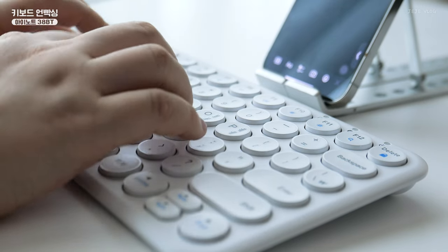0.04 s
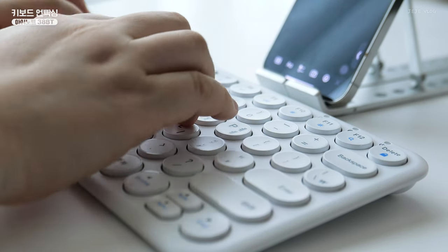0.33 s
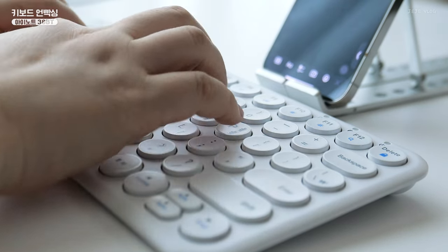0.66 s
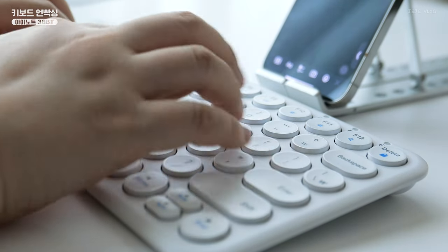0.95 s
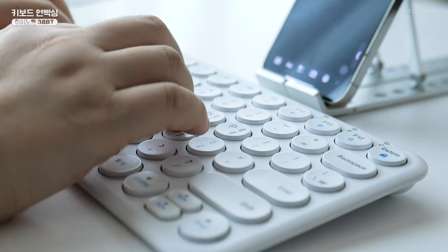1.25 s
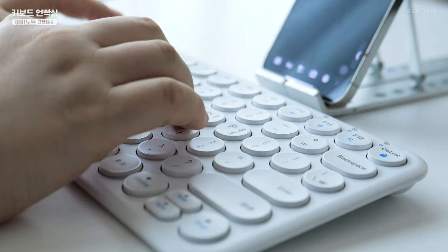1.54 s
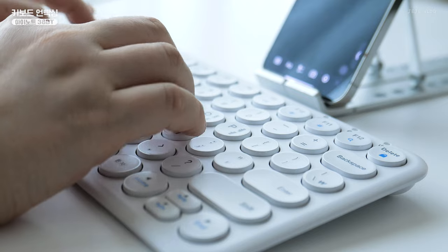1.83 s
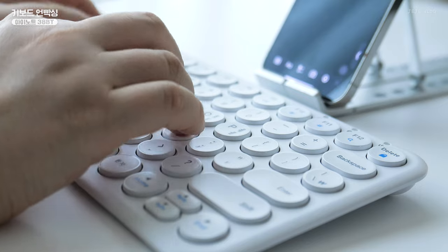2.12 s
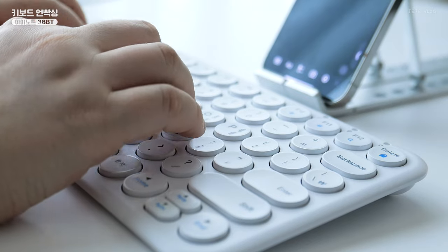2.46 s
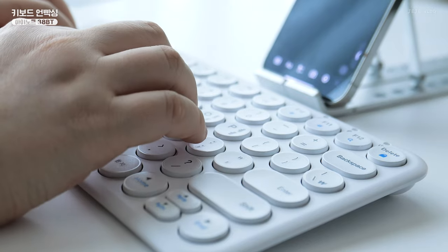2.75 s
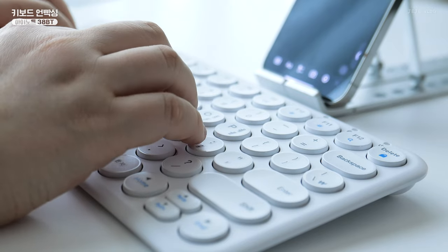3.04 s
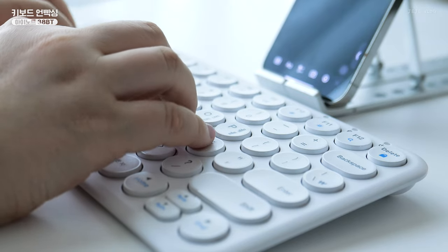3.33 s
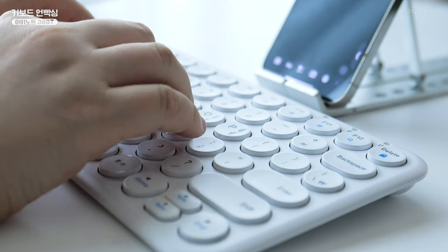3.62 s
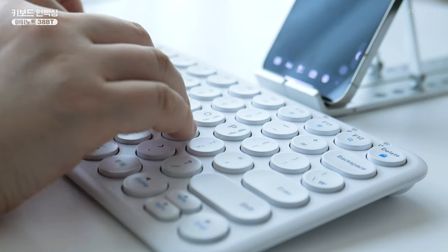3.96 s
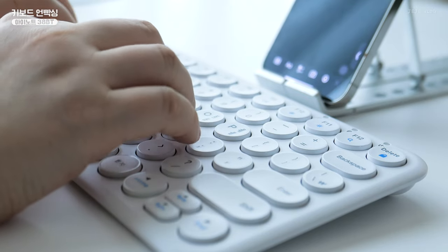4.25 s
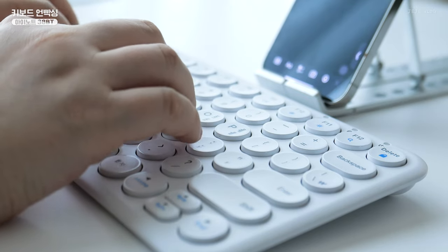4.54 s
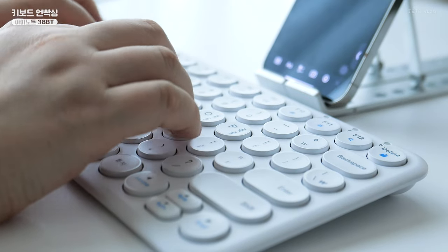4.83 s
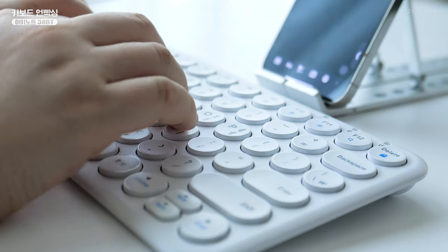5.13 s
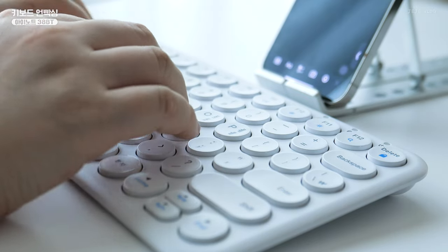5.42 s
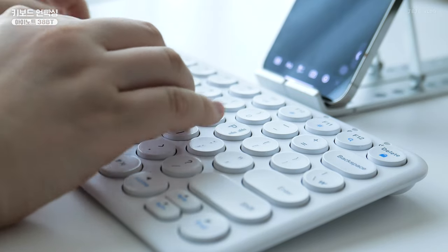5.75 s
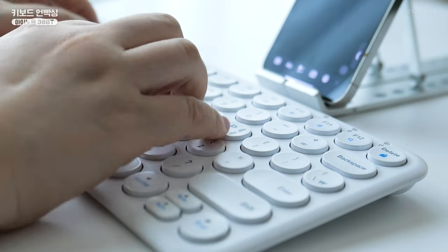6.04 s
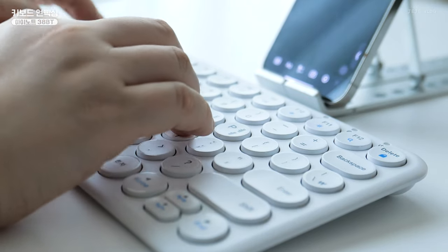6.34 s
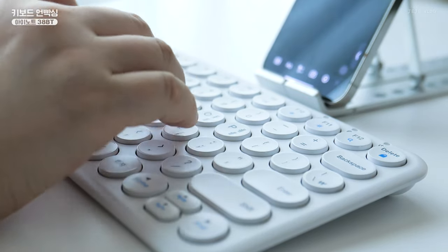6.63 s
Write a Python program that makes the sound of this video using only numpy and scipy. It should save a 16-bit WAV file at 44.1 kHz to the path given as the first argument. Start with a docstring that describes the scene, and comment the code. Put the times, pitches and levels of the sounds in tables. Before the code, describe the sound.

Quiet, uneven typing on a small plastic keyboard, with light taps, a few sharper clicks and a brief lull midway.

```python
"""Fingers type on a small plastic keyboard, brushing over its caps now and then, in a quiet room.
Each stroke is a brief impact that excites damped modes: soft taps knock a hollow note from the base
plate, and a few firm strokes snap brightly and thump the desk. Loose keys rattle and a hand sometimes
bumps the desk. Reflections add a short tail; a faint rumble and a thin whine lie underneath."""
import sys
import numpy as np
from scipy import signal
from scipy.fft import rfft, irfft
from scipy.io import wavfile

SR = 44100
rng = np.random.default_rng(int(sys.argv[2]) if len(sys.argv) > 2 else 0)


def inscribe(sig):
    """Save sig as 16-bit PCM at rate SR to the path in sys.argv[1].

    A 1-D sig is mono; a 2-D sig holds one channel per row.
    Samples are clipped to [-1, 1] before scaling.
    """
    pcm = np.round(np.clip(np.atleast_2d(sig).T, -1, 1) * 32767)
    wavfile.write(sys.argv[1], SR, pcm.astype(np.int16))


N = 303408
T = np.arange(N) / SR
RING_SAMPLES, LEAD_S = 5000, .008  # length of one stroke; its lead-in before the key lands
ZONES = 7  # strokes take turns among this many sets of paths through the room

# firm strokes: t/s, contact time/s, f/Hz of the plate, cap and rim notes, then level/dB of
# desk thump, plate knock, hinge clack, stem click, cap snap, cap note, rim tick, rim note
FIRM_STROKES = [ (0.135, .0012, 1370, 6800, 8840, -55, -52, -51.5, -46.5, -33, -37, -35, -33.5),
                (0.9329, .003, 1215, 5480, 8070, -45, -46.5, -46, -56, -48, -39, -48, -55),
                (1.034, .0017, 1294, 5880, 9960, -53, -43.5, -44.5, -73, -49, -39.5, -46, -53),
                (1.356, .0028, 890, 5560, 8010, -65, -65, -52.5, -51, -43.5, -46, -43.5, -45.5),
                (1.385, .0012, 1260, 5750, 8170, -51, -46, -45.5, -50, -35, -39.5, -39.5, -39),
                (1.5594, .0021, 1150, 6380, 9490, -63, -58, -49, -42, -36, -47, -38, -47),
                (2.7937, .0035, 805, 6070, 9180, -50.5, -48, -54, -46, -40.5, -47.5, -40.5, -52),
                (2.9764, .0019, 1360, 5060, 10150, -56.5, -59, -55, -43, -38, -40.5, -37.5, -50),
                (4.4562, .0022, 830, 6280, 9690, -72, -69, -55, -43, -43, -42.5, -38, -46),
                (4.483, .0055, 815, 5930, 8010, -52.5, -52, -49, -47.5, -42, -52, -41, -49),
                (4.6455, .003, 1325, 6470, 9880, -57, -55.5, -56, -41, -36.5, -39, -39, -51),
                (5.464, .0022, 790, 4950, 9230, -62, -58.5, -51.5, -48, -40.5, -44.5, -43.5, -56),
                (5.652, .0018, 944, 5040, 8070, -57.5, -54, -51, -40, -38.5, -38.5, -40, -47),
                (6.076, .0017, 1027, 6550, 8170, -66, -45.5, -56, -49, -43, -45, -45.5, -52),
                (6.0998, .0046, 800, 6100, 8210, -51.5, -45.5, -45.5, -41.5, -39, -41.5, -40.5, -50),
                (6.2554, .0014, 1180, 6650, 8250, -59, -52.5, -54, -42, -35.5, -35.5, -39, -39.5), ]
# how busy the hands are: t/s, level/dB
ACTIVITY = [(0, -65.5), (2.1, -66), (2.7, -77), (3.4, -93), (3.8, -67.5), (4.4, -71), (5.1, -67),
            (6.88, -66.5)]
# normal modes of the desk and of each keyboard part: f/Hz, bandwidth/Hz, level/dB
DESK_MODES = [(107.6, 8.4, -13), (168, 16, -18), (231, 6.4, 1), (327, 21.6, 3.5), (352.5, 16, -6)]
PLATE_MODES = [(660, 130, -12), (821, 19.4, 0.5), (945, 43, 0), (1046, 44, -1), (1102.5, 18, 5),
               (1141, 12.4, -1), (1196, 130, -10), (1330, 120, 0)]
HINGE_MODES = [(1816, 67, 2.8), (1883, 150, 1.7), (2390, 580, -2), (2885, 650, 0.5), (3850, 460, -1.5)]
CAP_MODES = [(5130, 130, -6), (5700, 520, -4), (6640, 1900, 3)]
RIM_MODES = [(9180, 1100, 17), (9980, 740, 14), (11600, 1200, -6), (14100, 2500, -11)]


def undb(db):
    """Amplitude ratio of a level in decibels."""
    return 10 ** (np.asarray(db) / 20)


def level(x, db):
    """Scale x to an rms level."""
    return x * undb(db) / np.sqrt(np.mean(x ** 2))


def add(out, s, x):
    """Superposition: x joins out at s seconds."""
    i = max(int(s * SR), 0)
    out[i:i + len(x)] += x[:max(N - i, 0)]


def colour(x, points):
    """Zero-phase filtering by a curve of (f/Hz, level/dB) points."""
    hz, db = np.transpose(points)
    f = np.maximum(np.arange(len(x) // 2 + 1) * SR / len(x), 1)
    return irfft(rfft(x) * undb(np.interp(np.log(f), np.log(hz), db)), len(x))


def diffuse(mid, side):
    """Diffuse field: sum and difference of two uncorrelated sounds, widest at low frequencies."""
    # side relative to mid: f/Hz, level/dB
    width = [(40, -6), (130, 8), (300, 7.5), (600, 9.5), (1000, 3), (2000, 2), (4000, -4.5), (8000, -7),
             (13000, -3)]
    side = colour(side, width)
    return np.array([mid + side, mid - side])


def ring(modes, scatter=.01):
    """Impulse response as a sum of damped modes, each detuned a little at random."""
    hz, width, db = np.transpose(modes)[:, :, None]
    hz = hz * (1 + scatter * rng.standard_normal(hz.shape))
    t = np.arange(RING_SAMPLES) / SR
    partials = undb(db) * width * np.exp(-np.pi * width * t) * np.cos(2 * np.pi * hz * t)
    band = np.clip([hz.min() * 0.92, hz.max() * 1.062], 20, SR / 2 - 100)
    return signal.sosfilt(signal.butter(2, band, "bandpass", fs=SR, output="sos"), partials.sum(axis=0))


def finger_brushes():
    """Friction: skin rubs over the caps in fine grains, swelling and fading with the pressure."""
    # slides: t/s of the peak, duration/s, level/dB
    slides = [(0.0, 0.1, -51.5), (0.179, 0.041, -54.5), (4.351, 0.087, -61.5), (4.982, 0.085, -58.5),
              (5.682, 0.087, -56), (5.898, 0.24, -61.5), (6.322, 0.055, -55.5)]
    grains = rng.standard_normal(N) * undb(3.4 * rng.standard_normal(N))
    rub = colour(grains, [(70, -21), (400, -8), (1200, -2), (2500, -8.5), (5500, -4.5),
                          (9500, -8.5), (15000, -21)])
    pressure = sum(undb(db) * np.exp(-(2 * (T - s) / length) ** 2) for s, length, db in slides)
    return level(rub, -1) * pressure


def key_rattle(ticks_per_s=140, spread_db=3):
    """Shot noise: loose keys tick at random under resting fingers and ring plate, hinges and caps."""
    ticks = (rng.random(N) < ticks_per_s / SR) * rng.choice([-1, 1], N)
    ticks = ticks * undb(spread_db * rng.standard_normal(N))
    body = level(ring(PLATE_MODES), 0) + level(ring(HINGE_MODES), -2.7) + level(ring(CAP_MODES), -0.55)
    rattle = signal.fftconvolve(ticks, body)[:N]
    return level(rattle, -2) * undb(np.interp(T, *np.transpose(ACTIVITY)))


def air(whine_hz=4012, whine_db=-72, waver_db=1.9):
    """Background noise: broadband rumble and hiss, and a narrow band heard as a wavering whine."""
    # relative spectrum of the quiet room: f/Hz, level/dB
    spectrum = [(30, -24), (50, -18), (90, -18), (109, -3.5), (130, -10), (225, -4), (275, -5.5),
                (325, -7.5), (400, -11), (473, -21.5), (620, -12.5), (900, -14), (1600, -18), (3500, -22),
                (6500, -23), (11000, -25.5), (16000, -35.5)]
    rumble = diffuse(*(level(colour(rng.standard_normal(N), spectrum), -61) for _ in range(2)))
    narrow = signal.iirpeak(whine_hz, Q=18, fs=SR)
    whine = signal.lfilter(*narrow, signal.lfilter(*narrow, rng.standard_normal(N)))
    waver = np.interp(T, np.linspace(0, T[-1], 70), rng.standard_normal(70))
    return rumble + level(whine, whine_db + waver_db * waver)


def contact(length, after_db, give_db, main_db, settle_s=0.0089, give_s=0.0053):
    """Contact force: a key gives with a crackle, lands in a cluster of impacts and chatters to rest."""
    t = np.arange(RING_SAMPLES // 5) / SR - LEAD_S
    length = max(length, 0.0005)
    give = undb(give_db) * np.exp(t / give_s)
    landing = np.exp(-(t / length) ** 4) + undb(after_db) * np.exp(-t / settle_s)
    force = np.where(t < 0, give, landing) * rng.standard_normal(len(t))
    # one impact stands out, the more so in a short contact
    main = undb(main_db) * np.linalg.norm(force) / np.sqrt(1 + length / settle_s)
    force[np.searchsorted(t, length / 3)] += main
    return force


def press(push, rough_db, shove_s=0.00036):
    """Inertia: the heavy plate feels a contact as one smooth shove and a little of the chatter."""
    t = np.arange(len(push)) / SR - LEAD_S - shove_s
    shove = np.exp(-(2 * t / shove_s) ** 2)
    return shove / shove.sum() + undb(rough_db) * push / np.linalg.norm(push)


def strike(push, response, db):
    """Convolution of force and impulse response; db is the level with its energy spread over 10 ms."""
    y = signal.fftconvolve(push, response)[:RING_SAMPLES]
    return y * undb(db) * np.sqrt(SR / 100 / np.sum(y ** 2))


def favour(modes, hz, boost_db, octaves):
    """Selective excitation: a contact drives the modes near one frequency best."""
    return [(f, width, db + boost_db * np.exp(-(np.log2(f / hz) / octaves) ** 2))
            for f, width, db in modes]


def soft_taps(contact_s=0.0024):
    """Modal response to light impacts: a hollow note from the plate under ticks of cap and rim."""
    # presses and releases: t/s, plate note f/Hz, level/dB of plate knock, hinge clack, cap tick, rim tick
    taps = [(0.0858, 953, -55.5, -76, -64, -67), (0.204, 1340, -55, -51.5, -53, -60.0),
            (0.2721, 940, -56.5, -75, -54.5, -63), (0.2985, 920, -52.5, -61, -55, -62),
            (0.3103, 933, -48, -58.5, -59.5, -75.0), (0.375, 1120, -51, -50, -49.5, -59),
            (0.3794, 1050, -53, -65, -53, -60.0), (0.4107, 1120, -55.5, -58.5, -53, -65.0),
            (0.4424, 1082, -45.5, -52, -56.5, -66), (0.4474, 1030, -47.5, -63, -53, -70),
            (0.489, 925, -59, -60, -57, -61), (0.524, 1130, -56, -66, -67, -65),
            (0.547, 1100, -57.5, -55, -66.5, -69.5), (0.642, 1094, -49, -56, -56, -63),
            (0.6478, 1070, -49.5, -51.5, -48.5, -54.5), (0.6949, 940, -62, -54.5, -53.5, -60.5),
            (0.792, 960, -53.0, -53.5, -55, -61), (0.811, 1120, -60.5, -61, -65, -71.5),
            (0.908, 1270, -75, -61, -65, -78.0), (0.9187, 945, -62.5, -64, -53.5, -59),
            (1.1312, 956, -54.5, -60.5, -52.5, -59), (1.217, 930, -60, -70, -58, -65),
            (1.2537, 1040, -83, -57.5, -63, -67), (1.2956, 1315, -55.5, -53, -60.5, -66.5),
            (1.3894, 1300, -55.5, -45.5, -49.5, -45), (1.585, 1100, -51, -55, -50, -69),
            (1.7014, 1116, -48, -51, -58.5, -60.5), (1.731, 1160, -56, -61, -58, -63),
            (1.827, 820, -62.5, -64, -57, -67), (1.8697, 1360, -53.5, -57, -58, -63.5),
            (1.899, 825, -64, -61, -66, -71), (1.948, 910, -54.5, -57, -70, -68),
            (2.028, 1040, -52.5, -56, -46.5, -63), (2.121, 1080, -68, -65, -52.5, -58),
            (2.151, 1070, -64, -58, -63, -59), (2.1623, 1035, -53, -52.5, -51, -59),
            (2.2659, 1010, -55, -56.5, -55, -59), (2.453, 905, -59, -57.5, -57.5, -65.5),
            (2.4714, 1000, -61, -77, -69, -56.5), (2.62, 923, -57.5, -61.5, -68, -68),
            (2.743, 1170, -85, -63, -57.5, -70), (2.971, 1100, -68, -70, -53, -56),
            (3.4827, 780, -73, -59.5, -75, -81), (3.604, 1160, -59.5, -60, -48, -62),
            (3.6399, 1110, -57.5, -62.5, -59.5, -61.5), (3.729, 1290, -62.5, -62, -59, -62),
            (3.754, 940, -58.5, -62, -56, -62), (3.8176, 1110, -52, -55, -49.0, -53.5),
            (3.8503, 1120, -59, -58.5, -60, -66), (3.947, 1030, -63, -66, -63, -63),
            (4.0013, 1030, -51.5, -53, -54.5, -58), (4.1477, 1340, -63, -61, -58, -62),
            (4.1878, 1174, -57, -62, -58, -62.5), (4.3315, 1120, -56, -63.0, -59.5, -76),
            (4.459, 980, -71.5, -62, -39, -53), (4.7671, 1080, -54, -56, -60.5, -65),
            (4.841, 990, -69, -69, -63, -63), (4.876, 930, -59.5, -50.5, -56.5, -59),
            (5.0113, 1000, -55, -50.5, -51, -60.5), (5.0863, 1090, -55, -61, -54, -62),
            (5.158, 813, -61, -49.5, -55.5, -65), (5.1883, 936, -54, -53, -52, -60.5),
            (5.288, 985, -62.5, -62, -60, -62.0), (5.326, 796, -60.5, -60.5, -59, -64),
            (5.374, 800, -62, -58.5, -59, -66), (5.434, 935, -63.5, -59, -61, -67),
            (5.51, 823, -53, -54, -49.5, -51.5), (5.603, 1023, -53.5, -66, -57, -57),
            (5.692, 800, -62, -57.5, -62, -65), (5.74, 950, -53.5, -57.5, -61, -65),
            (5.7887, 1076, -53, -59.5, -58.5, -57.5), (5.895, 1110, -52.5, -54, -49.5, -54.5),
            (5.9123, 1050, -53.5, -75, -60, -62), (5.9545, 920, -63, -55, -56, -74),
            (5.9756, 820, -65, -69, -58, -67.0), (6.1363, 1370, -54, -62, -62, -66.5),
            (6.176, 1110, -61, -58, -50.5, -58.5), (6.2007, 1060, -49, -59, -52.5, -67),
            (6.289, 1154, -47, -51, -53.5, -64), (6.3343, 1110, -63, -64, -66, -64),
            (6.4172, 1060, -57.5, -56, -54.5, -67), (6.4567, 1033, -52, -56.5, -55, -66.0),
            (6.48, 1040, -63, -58.5, -63, -65), (6.5383, 896, -54, -52, -47, -63),
            (6.6317, 1018, -51, -55.5, -51.5, -62.5), (6.6642, 1060, -58, -65, -61.5, -69),
            (6.7342, 1140, -74, -62.5, -59, -71), (6.7841, 1113, -49.5, -55, -58.5, -67)]
    rim_modes = favour(RIM_MODES, hz=13500, boost_db=21, octaves=0.48)
    zones = np.zeros((ZONES, N))
    for k, (s, plate_hz, knock, clack, tick, rim) in enumerate(taps + grazes()):
        length = contact_s * undb(0.35 * (knock - tick))  # a duller tap is a longer push
        push = contact(length, after_db=-14, give_db=-13.5, main_db=-8.5)
        # the plate rings most at the note of the spot that is struck
        plate = ring(PLATE_MODES + [(plate_hz, 38, 9)], scatter=0.0065)
        key = strike(press(push, rough_db=-8.5), plate, knock - 0.1)
        key += strike(push, ring(HINGE_MODES, scatter=0.088), clack + 0.1)
        key += strike(push, ring(CAP_MODES, scatter=0.063), tick - 0.5)
        # the hard rim touches only for an instant, however slow the finger
        flick = contact(0.0013, after_db=-12, give_db=-14, main_db=-12)
        key += strike(flick, ring(rim_modes, scatter=0.034), rim - 1)
        add(zones[k % ZONES], s - LEAD_S, key)
        add(zones[k % ZONES], s + 0.0018, strike(np.hanning(50), ring(DESK_MODES), knock - 14))
    return zones


def grazes(count=16, plate_hz=1080):
    """Glancing impacts on nearby keys, stronger when the hands are busy; extra rows for soft_taps."""
    s = (np.arange(count) + rng.random(count)) * T[-1] / count
    busy_db = np.interp(s, *np.transpose(ACTIVITY))
    knock, clack, tick = busy_db + rng.standard_normal((count, 3)).T
    return list(zip(s, np.full(count, plate_hz), knock + 1, clack - 1, tick - 1, tick - 7))


def note(hz, length, db, decay_s):
    """Damped oscillator: one mode builds up during the contact, then decays freely; db as in strike."""
    t = np.maximum(np.arange(RING_SAMPLES) / SR - LEAD_S, 0)
    envelope = (1 - np.exp(-(2 * t / length) ** 2)) * np.exp(-t / decay_s)
    return strike(np.ones(1), envelope * np.sin(2 * np.pi * (hz * t + rng.random())), db)


def firm_strokes():
    """Hard impact: the cap snaps on its stop, stem and hinge clack, the less damped desk rings on."""
    # modes of the key stem: f/Hz, bandwidth/Hz, level/dB
    stem_modes = [(2900, 1400, -13), (3630, 480, -14), (4020, 120, 2)]
    zones = np.zeros((ZONES, N))
    for k, (s, length, plate_hz, cap_hz, rim_hz, *levels) in enumerate(FIRM_STROKES):
        thump, knock, clack, click, snap, cap_ring, rim, rim_ring = levels
        push = contact(length, after_db=-21.5, give_db=-13.5, main_db=-11, give_s=0.0014)
        key = strike(push, ring(CAP_MODES, scatter=0.0026), snap - 1)
        key += strike(push, ring(RIM_MODES, scatter=0.024), rim - 2)
        # over the modes that all keys share, each cap and rim has a note of its own
        key += note(cap_hz, length, cap_ring - 1, decay_s=0.0011)
        key += note(rim_hz, length, rim_ring - 1, decay_s=0.00056)
        key += strike(push, ring(stem_modes), click - 1)
        key += strike(push, ring(HINGE_MODES, scatter=0.016), clack)
        plate = ring(PLATE_MODES + [(plate_hz, 40, 11)], scatter=0.008)
        key += strike(press(push, rough_db=-6.5), plate, knock - 1)
        add(zones[k % ZONES], s - LEAD_S, key)
        # the rubber feet pass a softened push on to the desk
        add(zones[k % ZONES], s + 0.0012, strike(np.hanning(50), ring(DESK_MODES), thump + 1))
    return zones


def snap_wash(gain_db=-14, t60=0.22, rise_s=0.0014):
    """Diffuse reverberation: a firm snap radiates all round and its treble returns as a short hiss."""
    # relative spectrum of the hiss: f/Hz, level/dB
    spectrum = [(1500, -11), (3000, -28), (4100, -3.5), (5000, 1), (6400, 0.5), (7700, -3), (9300, -4),
                (11500, -7), (15000, -20)]
    t = np.arange(SR // 2) / SR
    fade = undb(-60 * t / t60) * (1 - np.exp(-(t / rise_s) ** 2))
    power = np.zeros(N)
    for s, *_, snap, cap_ring, _rim, _rim_ring in FIRM_STROKES:
        amplitude = np.hypot(undb(snap), undb(cap_ring)) * undb(gain_db)
        add(power, s, (amplitude * fade) ** 2)
    hiss = diffuse(*(level(colour(rng.standard_normal(N), spectrum), 0) for _ in range(2)))
    return np.sqrt(power) * hiss


def hand_bumps(push_s=0.0049, settle_s=0.007):
    """Soft impact: flesh pushes slowly on the desk, which swings at a low note and soon settles."""
    # bumps: t/s, f/Hz, level/dB
    bumps = [(0.825, 235, -54), (1.259, 203, -55), (1.734, 237, -53), (2.455, 245, -46.5),
             (3.486, 259, -48), (5.174, 235, -56.5), (5.514, 234, -54.5), (5.703, 243, -56.5)]
    out = np.zeros(N)
    t = np.arange(RING_SAMPLES) / SR - 2 * LEAD_S
    swing = np.where(t < 0, np.exp(-(t / push_s) ** 2), np.exp(-t / settle_s))
    for s, hz, db in bumps:
        add(out, s - 2 * LEAD_S, undb(db) * swing * np.sin(2 * np.pi * (hz * t + rng.random())))
    return out


def room(dry, early_s=0.0043, bounce_s=0.0084, t60=0.34):
    """Reflection: nearby things scatter at once, one surface bounces back, the walls add a short tail."""
    # strength of all reflections: f/Hz, level/dB
    walls = [(100, 18), (400, 4), (1000, 5.5), (2500, 6), (6000, 4), (10000, 3), (15000, 7)]
    # further dulling of the late echoes: f/Hz, level/dB
    dulling = [(2500, 0.5), (5000, -3.5), (15000, -0.5)]
    t = np.arange(SR // 2) / SR
    early = np.exp(-t / early_s) * (1 - np.exp(-(t / 0.0012) ** 2))
    bounce = np.exp(-((t - bounce_s) / 0.0023) ** 2)
    near = np.hypot(undb(-12) * early / np.linalg.norm(early), undb(-15) * bounce / np.linalg.norm(bounce))
    tail = undb(-60 * t / t60) * (1 - np.exp(-(t / 0.004) ** 2))
    tail *= undb(-14) / np.linalg.norm(tail)
    first = diffuse(*(colour(rng.standard_normal(len(t)), walls) for _ in range(2)))
    late = diffuse(*(colour(rng.standard_normal(len(t)), walls) for _ in range(2)))
    response = first * near + np.array([colour(x, dulling) for x in late]) * tail
    return signal.oaconvolve(dry[None], response, axes=1)[:, :N]


def scene(pan_db=1.6):
    """Superposition of direct sound from just left of centre, its reflections and the room's noise."""
    # low notes reach the two microphones out of phase; side relative to mid: f/Hz, level/dB
    quadrature = [(100, -6), (350, -24), (600, 3), (1000, -26), (2000, -22), (5000, -36)]
    sources = [*(firm_strokes() + soft_taps()), hand_bumps() + key_rattle() + finger_brushes()]
    mid = sum(sources)
    side = np.imag(signal.hilbert(colour(mid, quadrature)))
    direct = np.array([mid + side, mid - side]) * undb([[pan_db / 2], [-pan_db / 2]])
    return direct + sum(room(source) for source in sources) + snap_wash() + air()


def record(dry, top_hz=15900):
    """Band limiting: a steep low-pass filter cuts the highest treble."""
    return signal.sosfilt(signal.ellip(8, .2, 70, top_hz, fs=SR, output="sos"), dry)


dry = scene()
out = record(dry)
inscribe(out)
```